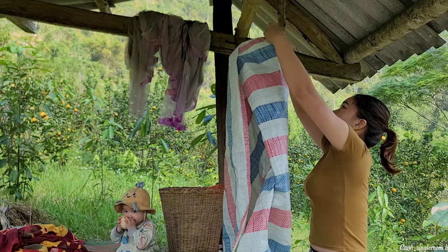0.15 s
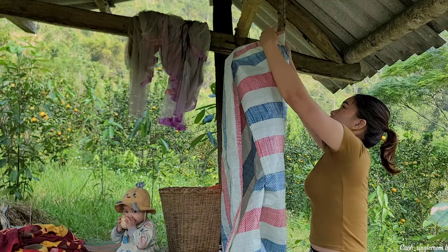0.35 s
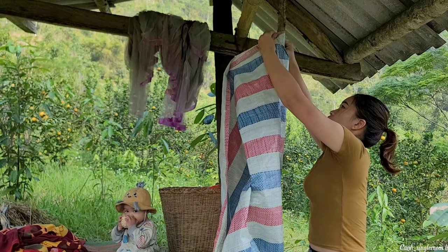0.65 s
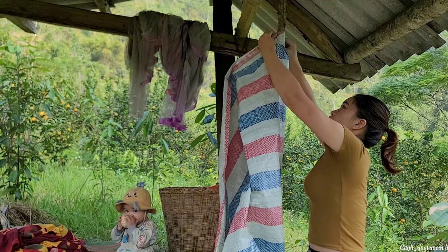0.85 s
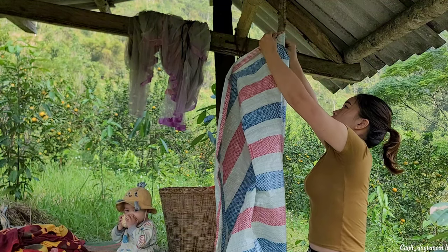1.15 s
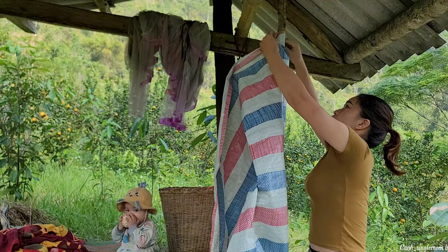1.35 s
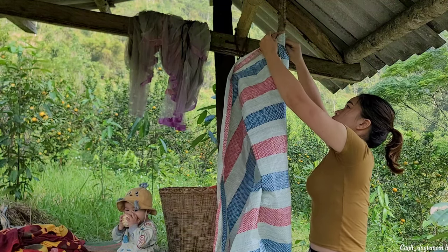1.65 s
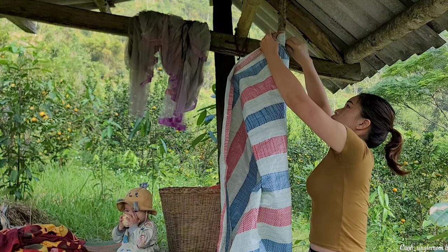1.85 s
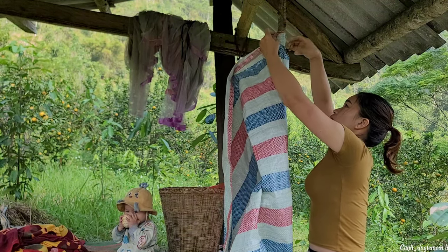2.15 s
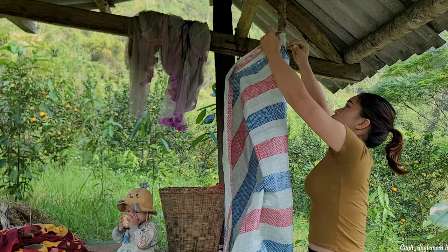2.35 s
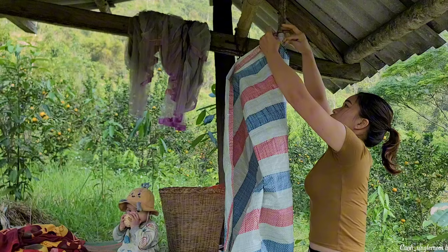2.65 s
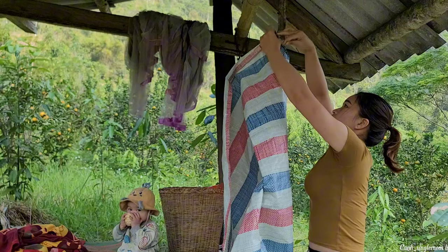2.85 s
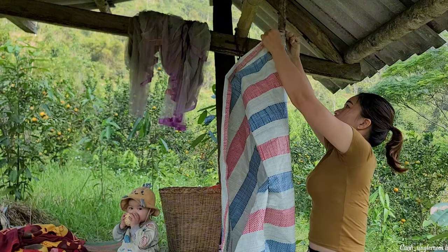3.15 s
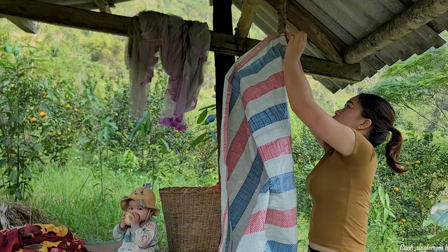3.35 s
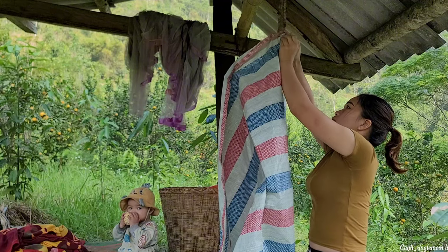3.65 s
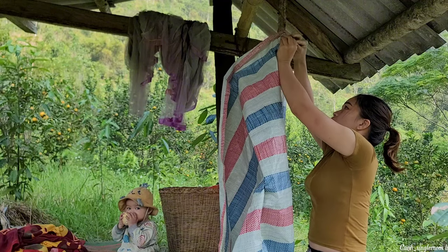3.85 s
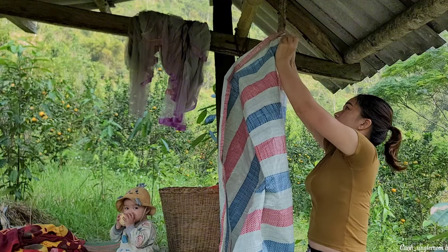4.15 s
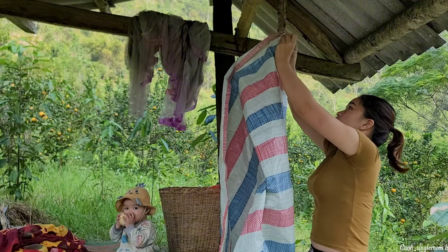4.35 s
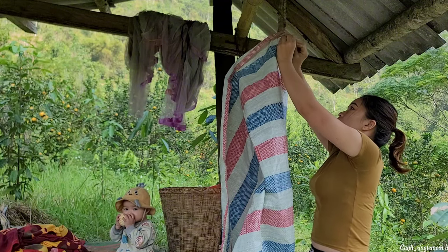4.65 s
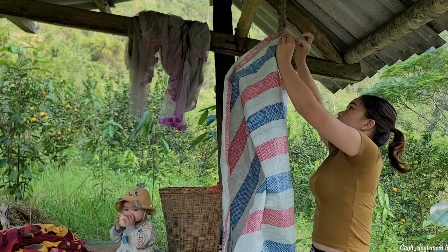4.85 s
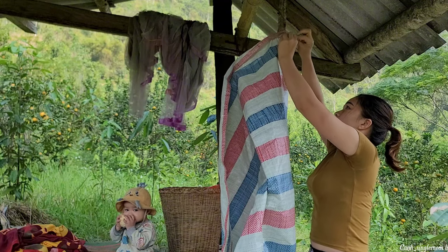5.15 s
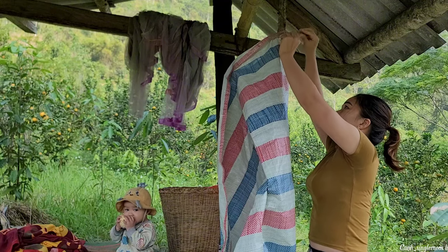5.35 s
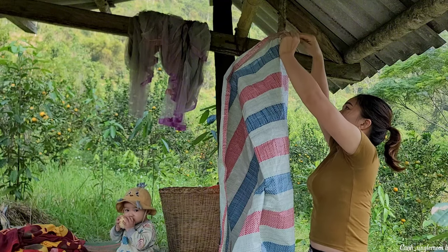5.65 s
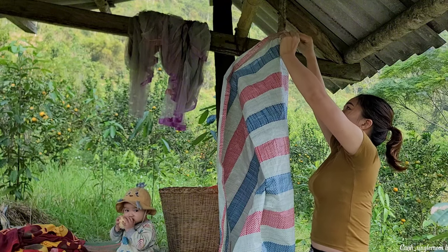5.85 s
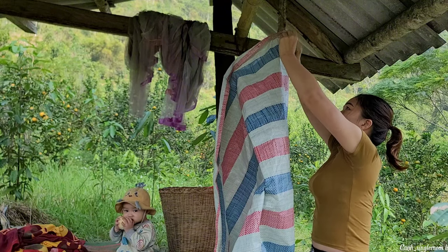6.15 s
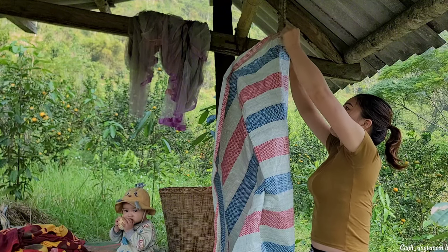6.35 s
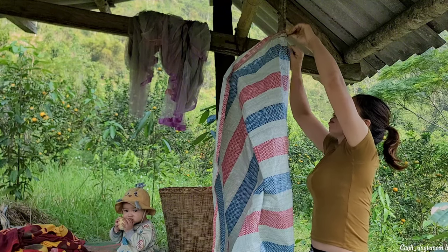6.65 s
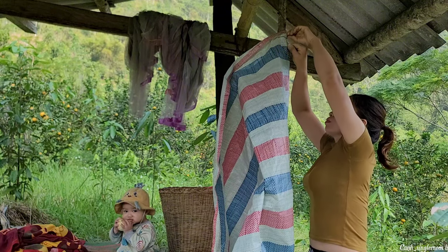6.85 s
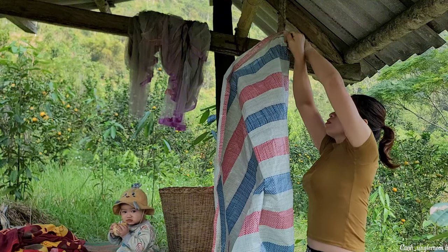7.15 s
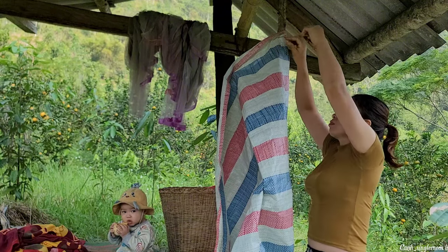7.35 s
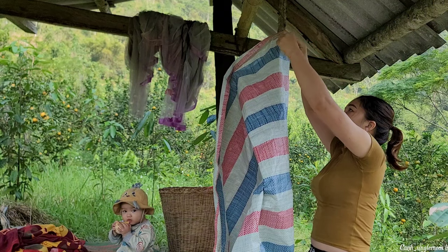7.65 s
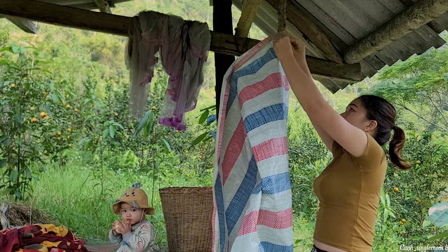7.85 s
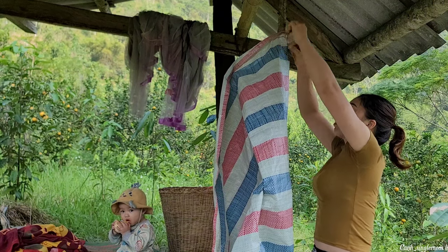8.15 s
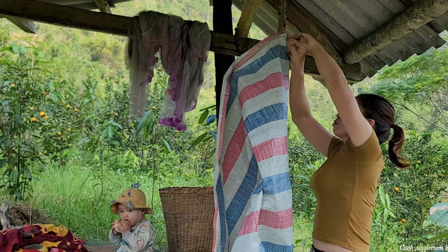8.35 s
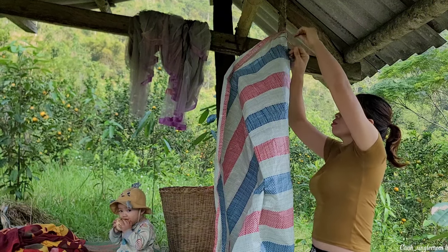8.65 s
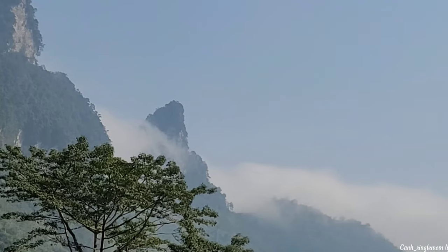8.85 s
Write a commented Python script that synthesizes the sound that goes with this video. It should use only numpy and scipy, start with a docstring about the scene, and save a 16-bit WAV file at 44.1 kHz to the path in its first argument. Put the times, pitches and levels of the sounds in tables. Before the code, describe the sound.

Hands tie a plastic tarpaulin to a beam: two loud cracks, a bright double jerk, a quick zip, then lighter crackles and rubbing with small pauses. Double wooden knocks stand out midway and later. Birds chirp among trees early on, with a brief warble later. The microphones are fairly near, in quiet open air with soft breeze. It ends abruptly with a short burst of windier open space.

```python
"""A woven plastic tarpaulin rustles, crackles and snaps as it is tied to a beam under an open roof.
Its folds are random trains of buckling clicks through resonances; snaps and wood knocks are struck noise.
Small birds and faint insect-like chirps are gliding tones; insects hiss and light wind rumbles as shaped noise.
Near the end everything breaks off and, after a brief silence, gives way to a windier, open place."""
import sys
import numpy as np
from scipy import signal
from scipy.fft import rfft, irfft, next_fast_len
from scipy.io import wavfile
from scipy.ndimage import uniform_filter1d

SR = 44100
rng = np.random.default_rng(int(sys.argv[2]) if len(sys.argv) > 2 else 0)


def log_audio(samples):
    """Write samples as a 16-bit WAV file to the path given in sys.argv[1]."""
    # one column per channel
    frames = np.atleast_2d(samples).T
    # limit to full scale, then quantise
    limited = np.clip(frames, -1, 1)
    pcm = np.round(limited * 32767).astype(np.int16)
    wavfile.write(sys.argv[1], SR, pcm)


N = 396459
TIME = np.arange(N) / SR
BREAK_S, OPEN_S = 8.741, 8.761  # the work is silent from the first, the open place starts at the second
# resonances of the draped sheet: (frequency [Hz], width [Hz], rise [dB])
SHEET_MODES = [(1045, 87, 9.5), (1420, 19, -2.5), (3270, 31, 7), (7080, 450, 8.5)]


def amp(db):
    """Level is logarithmic: decibels become an amplitude ratio."""
    return 10 ** (np.asarray(db) / 20)


def unit(x):
    """Mean power sets level: scales a signal to rms 1."""
    return x / np.sqrt(np.mean(x ** 2) + 1e-20)


def read(points, hz):
    """Pitch is heard in ratios: a spectrum in dB is joined on a log-frequency axis."""
    f, db = np.transpose(points)
    return np.interp(np.log(hz + 1), np.log(f + 1), db)


def at_time(points):
    """An envelope in dB is joined linearly over time."""
    s, db = np.transpose(points)
    return np.interp(TIME, s, db)


def add(mix, s, sound):
    """Superposition: adds a sound to the mix from time s."""
    part = mix[:, max(round(s * SR), 0):][:, :sound.shape[1]]
    part += sound[:, :part.shape[1]]


def drift(rate, count=N):
    """Low-passed Gaussian noise: a smooth random course of rms 1, changing about rate times a second."""
    lowpass = np.exp(-(np.fft.rfftfreq(count, 1 / SR) / rate) ** 2)
    return unit(irfft(rfft(rng.standard_normal(count)) * lowpass, count))


def ring(points, modes=(), tilt=0, size=2048):
    """Minimum phase: a causal response of energy 1 follows from spectrum, resonances and tilt [dB/octave]."""
    hz = abs(np.fft.fftfreq(size, 1 / SR))
    db = read(points, hz) + tilt * np.log2(np.maximum(hz, 400) / 2000)
    db = db + sum(rise / (1 + (2 * (hz - f) / width) ** 2) for f, width, rise in modes)
    log_gain = np.log(amp(np.maximum(db, -90)))
    h = np.fft.ifft(np.exp(np.conj(signal.hilbert(log_gain)))).real
    return h / np.linalg.norm(h)


def passed(x, h):
    """Linear filtering: convolves channel by channel and keeps the length of x."""
    return signal.fftconvolve(np.atleast_2d(x), np.atleast_2d(h), axes=1)[:, :np.shape(x)[-1]]


def diffuse(count, points=None, alike=0.96):
    """Diffuse-field coherence: noise from all sides agrees at two spaced microphones only in the bass."""
    spacing_s = 0.0006  # travel time of sound between the microphones
    hz = np.fft.rfftfreq(count, 1 / SR)
    a, b = rfft(rng.standard_normal((2, count)))
    coherence = np.clip(alike, 0, 1) * np.sinc(2 * hz * spacing_s)
    colour = 1 if points is None else amp(read(points, hz))
    pair = np.array([a, coherence * a + np.sqrt(1 - coherence ** 2) * b])
    return unit(irfft(pair * colour, count))


def space(lag_samples, short_db, short_t60, long_db, long_t60, size=20000):
    """Reverberant decay: direct sound, first at the right, with a short and a long tail of diffuse scatter."""
    t = np.arange(size) / SR
    h = np.zeros((2, size))
    h[0, lag_samples] = h[1, 0] = 1
    for db, t60 in (short_db, short_t60), (long_db, long_t60):
        tail = diffuse(size) * np.exp(-np.log(1000) * t / t60)
        h += amp(db) * tail * np.sqrt(2) / np.linalg.norm(tail)
    return h / np.linalg.norm(h[0])


def uncoloured(h, width_hz=130):
    """Spectral whitening: evens out a scattered response, so it spreads a blow in time but keeps its colour."""
    count = next_fast_len(h.shape[1] + 2000)
    z = rfft(h, count)
    power = uniform_filter1d(np.mean(abs(z) ** 2, 0), max(int(width_hz * count / SR), 1))
    return irfft(z / np.sqrt(power + 1e-12), count)[:, :h.shape[1]]


def to_right(x, db):
    """Level difference between channels: leans a sound to the right, or to the left if negative."""
    return x * amp([[-db / 2], [db / 2]])


def outdoors():
    """Broadband noise fields: still air, a shimmering band of insects and the low rumble of a breeze."""
    # still outdoor air: (frequency [Hz], relative level [dB])
    air_spectrum = [(120, -23), (200, -5), (270, -11), (400, -4), (700, -7.5), (850, -9.5), (2300, -12),
                    (3500, -20.5), (4600, -5.5), (6500, -25.5), (7600, -26), (10000, -28), (15000, -18),
                    (16000, -14)]
    # soft resonances in the still air: (frequency [Hz], width [Hz], rise [dB])
    air_modes = [(352, 28.6, 10), (588, 23, 4.5), (710, 27, 8.5)]
    # insect band: (frequency [Hz], relative level [dB])
    insect_spectrum = [(3700, -68), (4300, -5), (4650, -4.5), (5300, -9), (5700, -14.5), (6400, -5.5),
                       (7000, -13.5), (7500, -57)]
    # breeze: (frequency [Hz], relative level [dB])
    wind_spectrum = [(12, -52), (22, -21), (45, -2.5), (62, -0.5), (80, -2.5), (100, 0), (120, -2.5),
                     (190, -16), (300, -29), (600, -68)]
    # mean course of the breeze: (time [s], level [dB])
    wind_course = [(0, -49.5), (.6, -56.5), (.88, -44.5), (1.14, -47.5), (1.28, -55.5), (2.2, -52.5),
                   (2.7, -58), (3.15, -53), (3.8, -53.5), (4.7, -53), (5.5, -58), (6.7, -52.5),
                   (7.05, -60.5), (7.3, -57.5), (7.9, -59.5), (8.7, -55.5)]
    air = amp(-60.5) * unit(passed(diffuse(N), ring(air_spectrum, air_modes, size=8192)))
    air = air * amp(.5 * drift(7.5))
    shimmer_db = 1.8 * drift(30) + drift(2)
    insects = amp(-66) * diffuse(N, insect_spectrum) * amp(shimmer_db)
    gust_db = 3 * drift(7.2)  # the breeze swells and drops at random
    wind = amp(at_time(wind_course) + gust_db) * diffuse(N, wind_spectrum, alike=.8)
    return to_right(air + insects, db=3.0) + to_right(wind, db=0.5)


def puffs():
    """Local turbulence: short eddies buffet the two microphones almost independently."""
    # low buffeting: (frequency [Hz], relative level [dB])
    buffet_spectrum = [(12, -39), (25, -8), (45, 9), (70, 3), (110, 4.5), (250, -47)]
    # puffs of air, mostly at one microphone: (time [s], length [s], level [dB], lean to the right [dB])
    puff_events = [(-.05, 0.15, -39.5, 4.5), (0.475, 0.055, -38.5, -3.5), (0.859, 0.046, -39.5, 16),
                   (1.062, 0.12, -47, 9), (3.355, 0.047, -43, 7), (3.476, 0.094, -44.5, 13),
                   (3.663, 0.074, -47, 16), (3.767, 0.15, -52, 19), (6.61, 0.18, -49.5, 14),
                   (7.19, 0.13, -51.5, 10), (7.68, 0.083, -47, 3)]
    out = np.zeros((2, N))
    for s, length, db, lean_db in puff_events:
        swell = np.sin(np.pi * np.clip((TIME - s) / length, 0, 1))
        out += to_right(amp(db) * swell * diffuse(N, buffet_spectrum, alike=.2), lean_db)
    return out


def open_place():
    """Turbulent wind noise, mostly on the left, with a low decaying tone that sinks in pitch."""
    # wind in the open: (frequency [Hz], relative level [dB])
    open_spectrum = [(12, -37), (22, -2.5), (86, -2.5), (130, -11.5), (195, -12.5), (235, -39), (340, -24),
                     (420, -36), (1200, -34.5), (3600, -49), (4700, -33.5), (5500, -44), (6700, -45),
                     (7800, -63.5), (16000, -48)]
    t = np.maximum(TIME - OPEN_S, 0)
    turns = np.cumsum(345 * np.exp(-t / 0.27)) / SR
    wave = np.sin(2 * np.pi * turns) + 0.33 * np.sin(4 * np.pi * turns)
    tone = amp(-42.0) * np.exp(-t / 0.035) * wave
    gust = amp(-36.5 - 8.5 * t) * diffuse(N, open_spectrum, alike=0.76)
    return to_right(gust + tone, db=-6) * np.minimum(t / .003, 1)


def whine():
    """Slow amplitude and frequency modulation: a few thin tones swell and waver."""
    # partials: (frequency [Hz], relative level [dB])
    whine_tones = [(1755, -11.5), (2632, -5), (2848, -14)]
    # swelling of all partials together: (time [s], level [dB])
    whine_course = [(1.6, -88), (2.0, -64), (2.35, -68), (2.6, -95), (5.3, -98), (5.7, -75), (6.2, -68),
                    (6.8, -112), (7.7, -62), (8.1, -61), (8.35, -60), (8.7, -77)]
    tones = np.zeros(N)
    for hz, db in whine_tones:
        phase = 2 * np.pi * np.cumsum(hz + 3 * drift(10)) / SR
        tones += amp(db + 2 * drift(8)) * np.sin(phase)
    return amp(at_time(whine_course)) * tones


def note(length, pitches, db, rasp):
    """Frequency modulation: a note glides through even pitch steps, roughened by a fast, uneven buzz."""
    buzz_hz = 368  # mean rate at which a rasping note trembles in pitch
    u = np.linspace(0, 1, int(length * SR))
    flutter, shake = (drift(rate, count=SR)[:len(u)] for rate in (550, 150))
    glide = np.interp(u, np.linspace(0, 1, len(pitches)), pitches)
    glide = uniform_filter1d(glide, size=len(u) // len(pitches), mode="nearest")
    buzz = np.sin(2 * np.pi * np.cumsum(buzz_hz * (1 + .3 * flutter)) / SR)
    roughness = rasp * (1 - .65 * u) * (.07 * buzz + .033 * flutter)  # strongest at the start
    hz = glide * (1 + .004 * flutter + roughness)
    swell = signal.windows.tukey(len(u), .18) * (.62 + .38 * np.sin(np.pi * u ** 1.6))
    swell = swell * amp((.8 + 2 * rasp) * shake)
    return (amp(db) * unit(swell) * np.sin(2 * np.pi * np.cumsum(hz) / SR))[None]


def through_trees(song, lag_samples, scatter_db):
    """Multiple scattering: direct sound, quick scatter from near leaves and a long trail from far trees."""
    trees = space(lag_samples, short_db=scatter_db, short_t60=0.062,
                  long_db=scatter_db - 4.5, long_t60=1.3, size=44000)
    return passed(song, uncoloured(trees))


def insect_chirps():
    """Frequency modulation in a scattering field: faint, diffuse, rasping insect-like chirps near 5 kHz."""
    # chirps: (time [s], level [dB])
    faint_chirps = [(.64, -59), (2.72, -57), (3.535, -56.5), (4.59, -60), (5.35, -57.5), (6.54, -58)]
    out = np.zeros((1, N))
    for s, db in faint_chirps:
        add(out, s, note(0.092, [4970, 5100, 4970], db, rasp=0.8))
    return through_trees(out, lag_samples=14, scatter_db=3)


def birds():
    """Gliding tones: falling chirps, slurs and one warbled phrase, scattered by the trees."""
    # falling chirps: (time [s], length [s], top pitch [Hz], final pitch [Hz], level [dB], rasp [0-1])
    chirps = [(0.856, .05, 3330, 2820, -45.5, 0.5), (1.056, .063, 3190, 2630, -49.5, 1),
              (1.185, .055, 3450, 2880, -42, 0.86), (1.448, .036, 3280, 2620, -41, .9),
              (1.585, .055, 3350, 2570, -39.5, 0.36), (2.931, .054, 3300, 2520, -40.5, 0.85),
              (3.082, .06, 3250, 2605, -43.5, 0.7), (7.449, .045, 3450, 2640, -42.5, .55),
              (7.601, .044, 3220, 2720, -45.5, .5)]
    # slurs that finish a chirp or twitter between chirps:
    # (time [s], length [s], starting pitch [Hz], final pitch [Hz], level [dB], rasp [0-1])
    slurs = [(0.899, 0.045, 2910, 2550, -43, 0.5), (1.231, 0.056, 2950, 2674, -42.5, 0.5),
             (1.474, 0.031, 2615, 2530, -40.5, 0.2), (1.632, 0.0418, 2764, 2514, -37, 0.2),
             (2.984, 0.021, 2520, 2550, -46, .3), (3.132, 0.038, 2755, 2540, -43, .3),
             (3.167, .034, 2520, 2490, -51, 0.06), (7.494, 0.027, 2500, 2420, -56, .2),
             (7.528, 0.072, 1850, 2340, -61.5, 0.1), (7.61, 0.062, 2380, 2510, -59, 0.2),
             (7.662, 0.046, 2580, 2410, -51, 0.24), (7.823, 0.031, 2480, 2380, -59, 0.2)]
    # a second bird's phrase: (time [s], length [s], level [dB], rasp [0-1], pitches at even steps [Hz])
    warble = [(6.301, .014, -52.5, .1, [2950, 3400, 3000]), (6.362, 0.011, -53, .1, [4000, 3500, 3500]),
              (6.383, 0.044, -47, 0, [2700, 3230, 3350, 3260, 3170]),
              (6.415, 0.05, -46, 0.1, [3160, 3206, 3350, 3160, 2770]),
              (6.494, 0.028, -47.5, .5, [2900, 2670, 2800]), (6.519, .02, -52, 0.4, [2550, 2420, 2800]),
              (6.54, 0.014, -43.5, .1, [3000, 3200, 3100])]
    song, warbler = np.zeros((2, 1, N))
    for s, length, top_hz, end_hz, db, rasp in chirps:
        add(song, s, note(length, np.linspace(top_hz, end_hz, 5), db, rasp))
    for s, length, start_hz, end_hz, db, rasp in slurs:
        middle_hz = 1.025 * (start_hz + end_hz) / 2  # bows slightly upward
        add(song, s, note(length, [start_hz, middle_hz, end_hz], db, rasp))
    for s, length, db, rasp, pitches in warble:
        add(warbler, s, note(length, pitches, db, rasp))
    out = to_right(through_trees(song, lag_samples=21, scatter_db=-4), db=2.5)
    return out + through_trees(warbler, lag_samples=12, scatter_db=-5)


def knocks():
    """Impact excitation of modes: wood is struck off to the right, rattles a moment and the yard answers."""
    # struck wood: (frequency [Hz], relative level [dB])
    wood_spectrum = [(100, -5.5), (260, -8), (440, -2), (560, -2), (800, 1), (1150, 0), (1900, -7.5),
                     (3200, -8.5), (4600, -20), (8000, -38), (15000, -72)]
    # resonances of the wood: (frequency [Hz], width [Hz], rise [dB])
    wood_modes = [(555, 37, 8), (1370, 44, 6.5), (1610, 90, 2.5), (2070, 78, 5), (2680, 45, -1)]
    # blows: (time [s], strength [dB], brightness [dB/octave], note of the struck part [Hz])
    blows = [(.742, -9, 3.5, 935), (.752, -17, -2.5, 940), (.775, -24, 8, 940), (.834, -21, 2, 1490),
             (.846, -31, 4, 940), (.861, -32, -7, 400), (4.3041, -7, 1, 716), (4.3116, -7, -.5, 710),
             (5.149, -25.5, -4.5, 716), (7.166, -10.5, 2, 990), (7.1715, -5, 1.5, 1005),
             (7.489, -17, -1.5, 970), (7.502, -28, -1.5, 970), (7.522, -29, -2, 970)]
    out = np.zeros((2, N))
    t = np.arange(-200, 4000) / SR  # the lead-in leaves room for the whitened path to spread backwards
    for s, db, tilt, note_hz in blows:
        hits = rng.standard_normal(len(t)) * (rng.random(len(t)) < 4000 / SR)
        rattle = hits * np.exp(-t / 0.01) * (t >= 0)
        path = space(lag_samples=20, short_db=0.5, short_t60=0.15, long_db=-1, long_t60=0.96)
        blow = uncoloured(passed(path, rattle), width_hz=215)
        body = ring(wood_spectrum, [*wood_modes, (note_hz, 105, 7.5)], tilt)
        add(out, s + t[0], amp(db) * passed(blow, body))
    return to_right(out, db=1.0)


def pings():
    """Damped oscillation: small hard things tick and ring with an exponential decay."""
    # rings: (time [s], pitch [Hz], starting level before the path [dB], t60 [s])
    ping_events = [(3.52, 2054, -42.5, 0.09), (3.252, 1072, -46, 0.045), (5.297, 1570, -43, 0.048),
                   (4, 1440, -43, 0.038), (5.298, 8425, -51.5, .06), (7.951, 2380, -40, 0.017),
                   (10, 2600, -46, .02)]
    out, t = np.zeros((1, N)), np.arange(8000) / SR
    for s, hz, db, t60 in ping_events:
        tone = amp(db - 60 * t / t60) * np.sin(2 * np.pi * hz * t)
        add(out, s, tone[None])
    path = space(lag_samples=1, short_db=-1, short_t60=0.017, long_db=-14, long_t60=.3)
    return to_right(passed(out, path), db=1)


def buckles(per_s, spread_db):
    """Random impulse process: tiny buckling clicks at chance times, of very unequal size."""
    size = amp(spread_db * np.minimum(rng.exponential(1, N), 3.5)) * rng.choice([-1, 1], N)
    return unit(size * (rng.random(N) < per_s / SR))


def slide():
    """Friction over a weave: the tie drawn across it gives a short, bright zip of very fine ticks."""
    # zip: (frequency [Hz], relative level [dB])
    slide_spectrum = [(500, -28), (1500, -6), (4000, 2), (6500, 2), (8700, 6), (10500, -5.5), (13000, -2.5),
                      (15500, -5)]
    start_s, length_s = 1.506, 0.14
    swell = np.sin(np.pi * np.clip((TIME - start_s) / length_s, 0, 1))
    zipping = passed(buckles(5000, spread_db=3) * swell, ring(slide_spectrum))
    path = space(lag_samples=3, short_db=0, short_t60=.05, long_db=-17, long_t60=.35)
    return to_right(amp(-43) * passed(zipping, uncoloured(path)), db=2.5)


def crack(crackle_s):
    """Snap-through: a taut crease flips with one crack, and the weave crackles on with a decay constant."""
    t = np.arange(16000) / SR
    weave = rng.standard_normal(len(t)) * (rng.random(len(t)) < 3500 / SR)
    flip = 0.38 * weave * np.exp(-t / crackle_s)
    flip[:3] = .22, .72, .22
    path = space(lag_samples=3, short_db=0, short_t60=.06, long_db=-16, long_t60=.35)
    return uncoloured(passed(path, flip))


def snaps():
    """Impulse response: cracks excite the sheet with a full sound, the tie with a thin, bright one."""
    # snapping sheet: (frequency [Hz], relative level [dB])
    snap_spectrum = [(100, -30), (300, -11.5), (600, -0.5), (1000, 2.5), (1400, 8.5), (1900, 3.5),
                     (3000, 6.5), (4000, 8.5), (5500, 7), (8000, 6), (12000, 3), (16000, 2)]
    # creases that snap: (time [s], strength [dB], brightness [dB/octave], crackle decay constant [s])
    snap_events = [(.284, -1.5, -1.5, 0.0083), (0.3054, 2, -3.5, 0.003), (0.3084, -1.5, -2, 0.0035),
                   (.417, -18.5, -5.5, 0.0047), (0.449, -24, -3.5, 0.0035), (0.498, -24, 1, 0.005),
                   (0.835, -22, -8, 0.013), (1.874, -32, 4, .004), (2.083, -35, 3, .003),
                   (2.314, -34, -6, .004), (2.523, -30, -3, .005), (2.6688, -32, -7, 0.003),
                   (2.707, -25, -5.5, 0.0096), (3.016, -23, -2, 0.0057), (3.045, -23.5, -2, 0.0029),
                   (3.232, -26, -3, 0.0057), (3.251, -34, 5, .005), (3.45, -45, 1, .004),
                   (3.524, -27, -7, .005), (3.575, -41, -4, .004), (3.816, -21, -3.5, 0.0029),
                   (3.958, -31, -3, 0.0095), (3.993, -24, -7, .002), (3.9994, -14, -6, 0.0054),
                   (4.007, -23, -5, .006), (4.126, -24.5, -4.5, 0.0034), (4.155, -34, 1, .002),
                   (4.572, -24, -8.5, 0.0057), (4.68, -24.5, -4, 0.0076), (4.942, -28, -2, .005),
                   (4.964, -32, -9, 0.0032), (5.149, -24.5, -12, 0.0044), (5.298, -28.5, -0.5, 0.0044),
                   (5.633, -35, -9, .005), (6.046, -28, -9, 0.01), (6.42, -26.5, -6.5, 0.009),
                   (6.673, -27, -4, 0.012), (6.987, -35, -11, .005), (7.03, -20.5, -2, 0.0066),
                   (7.343, -19, -2.5, 0.01), (7.9496, -22.5, -4, 0.0046), (7.965, -30, -4, 0.005),
                   (8.14, -25.5, -0.5, .004), (8.225, -30.5, -2, .003), (8.346, -25.5, -3, 0.0055),
                   (8.465, -21, -3, 0.008), (8.525, -22, -2, .003), (8.556, -25, -5.5, 0.0034),
                   (8.581, -26, -1, .004), (8.602, -20.5, -7.5, .0054), (8.664, -19.5, -3.5, .008)]
    # jerked tie: (frequency [Hz], relative level [dB])
    jerk_spectrum = [(400, -20), (1500, -25), (2400, 0), (3500, 4.5), (5500, 7), (8000, -2), (16000, -11)]
    # the tie is jerked tight with a double crack: (time [s], strength [dB], crackle decay constant [s])
    jerk_events = [(1.1178, -11, .003), (1.121, -12, .006)]
    out = np.zeros((2, N))
    for s, db, tilt, crackle_s in snap_events:
        add(out, s, amp(db) * passed(crack(crackle_s), ring(snap_spectrum, SHEET_MODES, tilt)))
    for s, db, crackle_s in jerk_events:
        add(out, s, amp(db) * passed(crack(crackle_s), ring(jerk_spectrum)))
    return to_right(out, db=2.0)


def handling():
    """Addition of powers: restless stirring, and strokes that rise, hold and settle, drive the sheet."""
    # stirring of the held sheet, least while the knot is held still: (time [s], mean level of rubbing [dB])
    stir_course = [(0, -67), (1.0, -69.5), (1.8, -72), (2.35, -74.5), (2.6, -69), (2.8, -83.5), (3.1, -63),
                   (3.4, -74), (4.2, -71.5), (5.1, -70), (5.45, -85.5), (5.9, -89), (6.2, -73.5),
                   (6.9, -72), (7.5, -85), (8.05, -76.5), (8.7, -68)]
    # pulls and shoves: (time [s], length [s], flexing [dB], rubbing [dB], crisp crinkling [dB])
    strokes = [(0.068, 0.032, -69, -56, -61), (0.395, 0.053, -61, -54, -64),
               (0.518, 0.097, -69, -59.5, -62.5), (0.675, 0.048, -60, -64.5, -84),
               (0.75, 0.045, -65, -71, -85), (0.823, 0.054, -59, -55.5, -58),
               (1.114, 0.037, -75, -72, -45.5), (1.146, 0.069, -60.5, -58, -55),
               (1.335, 0.07, -88, -67, -62.5), (1.543, 0.068, -66.5, -61, -60),
               (2.075, 0.11, -87, -68, -72), (2.481, 0.051, -69, -60.5, -66), (2.657, 0.06, -82, -63, -85),
               (2.996, 0.1, -63, -66.5, -67.5), (3.2, 0.059, -63.5, -59.5, -58.5),
               (3.45, 0.14, -70, -64.5, -65.5), (3.801, 0.092, -70, -64, -64), (3.955, 0.06, -67, -62, -62),
               (4.102, 0.1, -72, -66, -66), (4.552, 0.13, -69, -65, -72), (4.952, 0.024, -61, -66.5, -69),
               (5.599, 0.029, -82, -69, -87), (6.425, 0.14, -72, -74, -65.5),
               (6.657, 0.021, -63.5, -59.5, -72), (6.972, 0.06, -69, -77, -64),
               (7.225, 0.11, -66, -67, -63.5), (7.717, 0.078, -69, -65.5, -69), (8.26, 0.04, -66, -76, -87),
               (8.388, 0.092, -71, -63.5, -71), (8.528, 0.15, -65, -58, -62)]
    attack_s, release_s = 0.012, 0.012  # linear rise, then decay constant of the settling folds
    stir_db = at_time(stir_course) + 3 * drift(14)  # the level wavers at random
    power = (amp(stir_db) * amp([[-13.5], [0], [0]])) ** 2  # rows: flex, rub, crisp
    t = np.arange(SR // 2) / SR
    for s, length, flex_db, rub_db, crisp_db in strokes:
        stroke = np.minimum(t / attack_s, 1) * np.exp(-np.maximum(t - length, 0) / release_s)
        add(power, s, (amp([[flex_db], [rub_db], [crisp_db]]) * stroke) ** 2)
    return np.sqrt(power)


def rustle():
    """Clustered buckling excites sheet resonances: each patch has its own creases and path to the pair."""
    # flexing folds: (frequency [Hz], relative level [dB])
    flex_spectrum = [(150, -14.5), (260, -3.5), (350, 13), (480, -3), (650, 8), (850, 0.5), (1200, -11),
                     (3000, -41)]
    # rubbing folds: (frequency [Hz], relative level [dB])
    rub_spectrum = [(400, -35.5), (750, -11), (1030, -6), (1400, 1.5), (1800, -2), (2400, 0.5), (4000, -2),
                    (6500, -7.5), (9000, -19.5), (15000, -83)]
    # crisp crinkling: (frequency [Hz], relative level [dB])
    crinkle_spectrum = [(1000, -9), (2500, -3), (4000, 2.5), (6500, 2.5), (8700, -0.5), (10500, -7.5),
                        (13000, -4), (15500, -15)]
    # patches of the sheet: (resonance of the long crease [Hz], resonance of the short crease [Hz])
    patches = [(950, 2410), (1300, 4200), (1850, 4220)]
    flex, rub, crisp = handling()
    out = np.zeros((2, N))
    for lag, pitches in enumerate(patches, 2):
        clumps = unit(amp(2.7 * drift(60)))
        rates = (300, 1000, 420, 420)  # clicks per second
        heavy, fine, *coarse = (buckles(per_s, spread_db=4.6) * clumps for per_s in rates)
        sheet = passed(heavy * flex, ring(flex_spectrum))
        sheet += passed((fine + 0.2 * coarse[1]) * crisp, ring(crinkle_spectrum))
        for clicks, hz in zip(coarse, pitches):
            crease = (hz, .3 * hz, 10)
            sheet += passed(clicks * rub, ring(rub_spectrum, [*SHEET_MODES, crease]))
        path = space(lag_samples=lag, short_db=0, short_t60=.05, long_db=-17, long_t60=.35)
        out += passed(sheet, uncoloured(path))
    return to_right(out, db=1.0)


def scene():
    """Superposition of sources: the work under the roof, a brief silence, then the open place."""
    fade = np.clip((BREAK_S - TIME) / .015, 0, 1)
    background = outdoors() + puffs() + whine() + insect_chirps() + birds()
    work = knocks() + pings() + slide() + snaps() + rustle()
    return (background + work) * fade + open_place()


def record(dry):
    """Band limitation: a linear-phase low-pass at 15.9 kHz is the recorder's upper limit."""
    lowpass = signal.firwin(511, 15900, window=("kaiser", 9), fs=SR)
    return signal.oaconvolve(dry, lowpass[None], "same")


dry = scene()
out = record(dry)
log_audio(out)
```